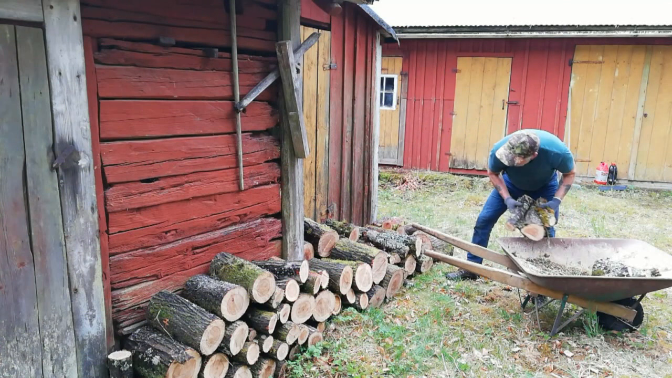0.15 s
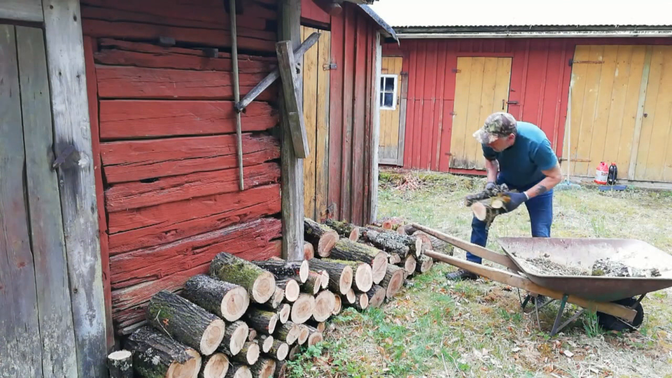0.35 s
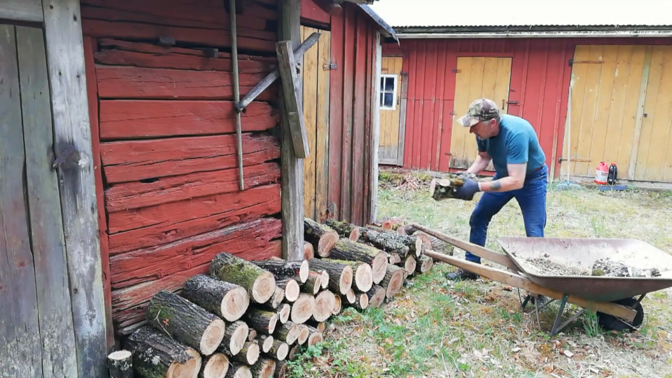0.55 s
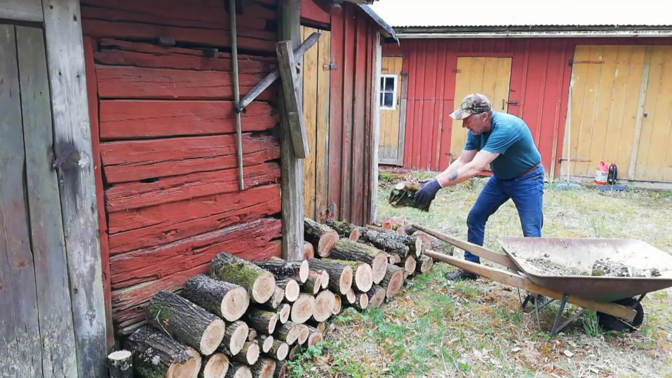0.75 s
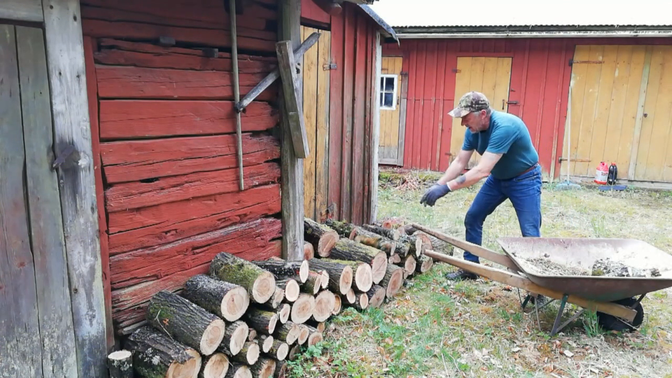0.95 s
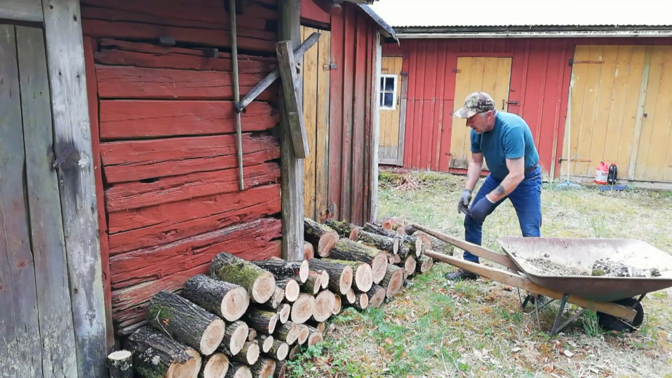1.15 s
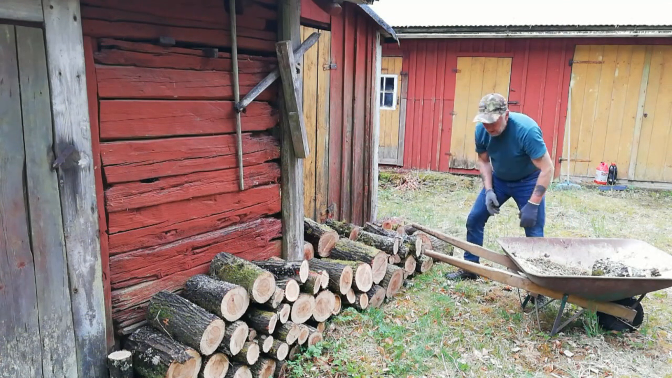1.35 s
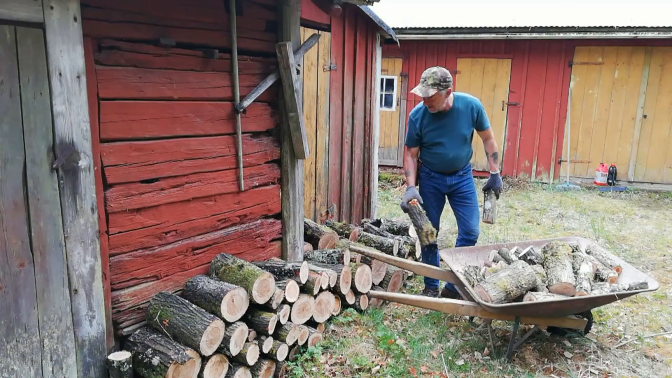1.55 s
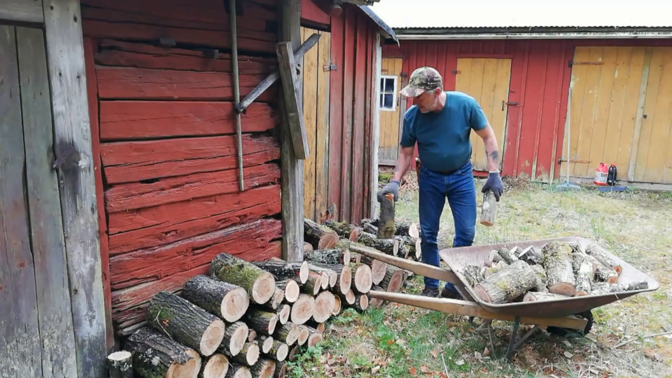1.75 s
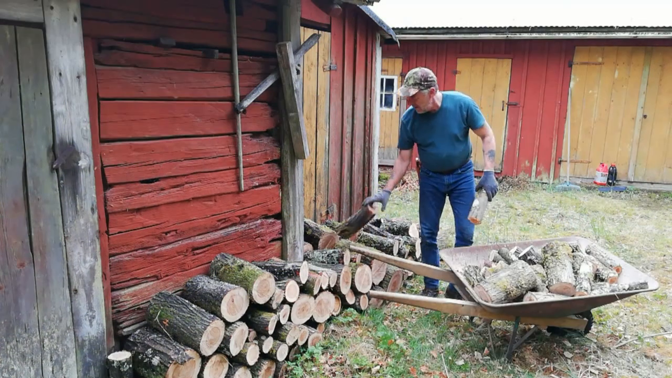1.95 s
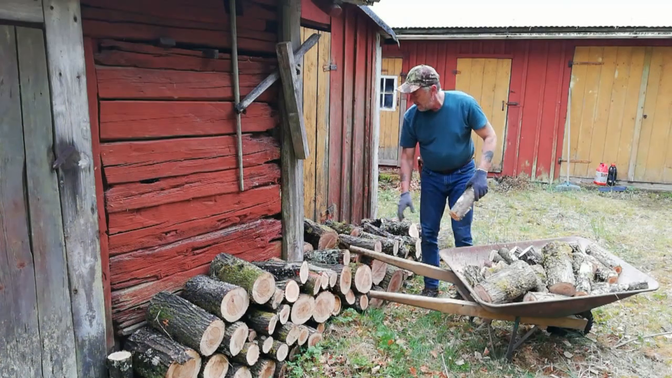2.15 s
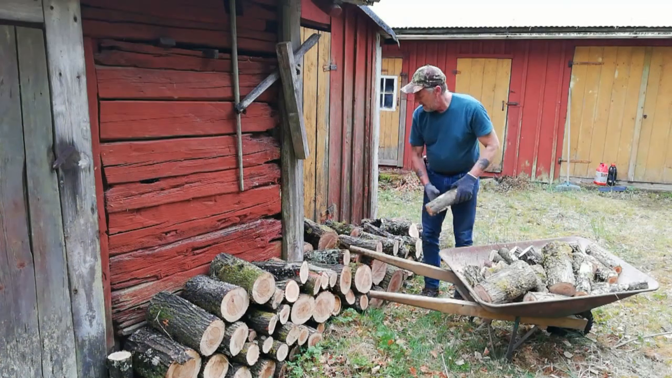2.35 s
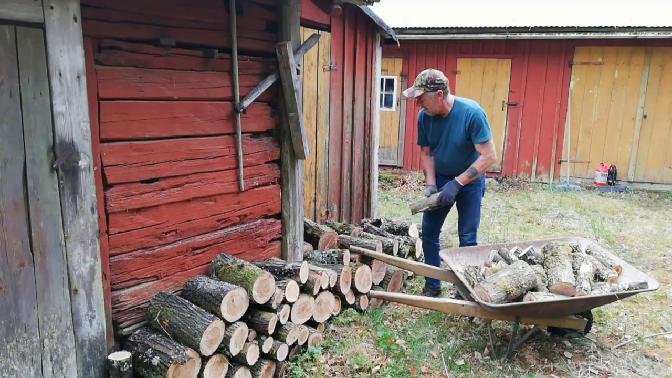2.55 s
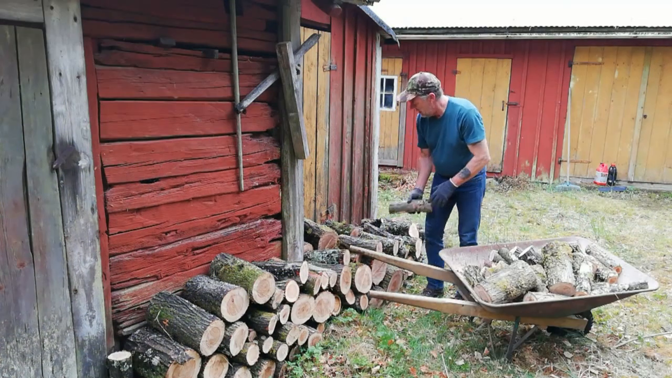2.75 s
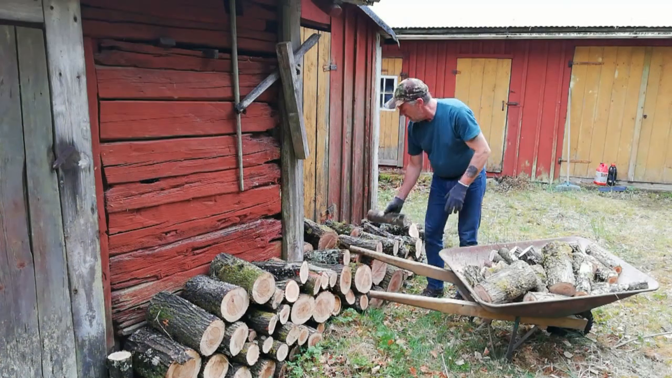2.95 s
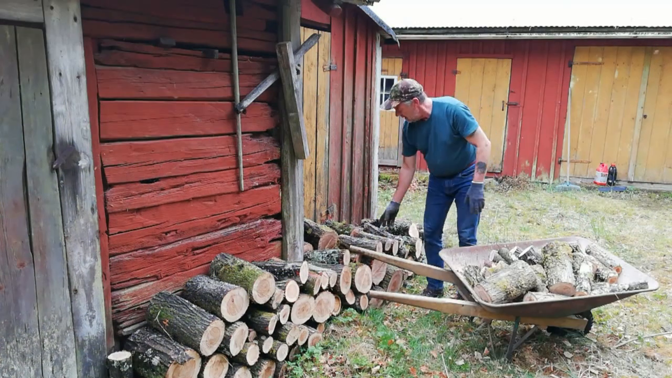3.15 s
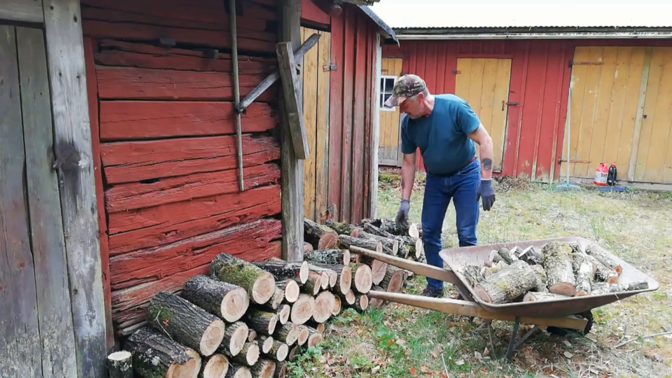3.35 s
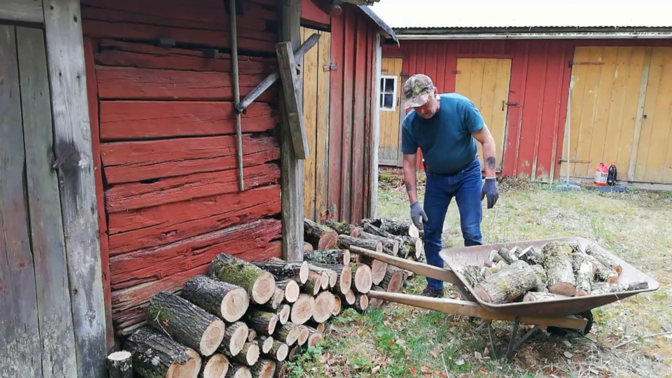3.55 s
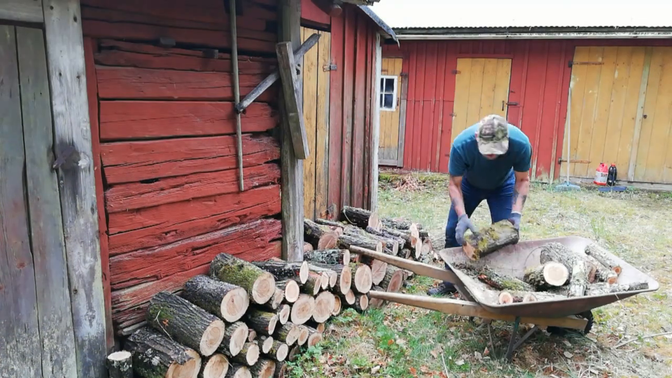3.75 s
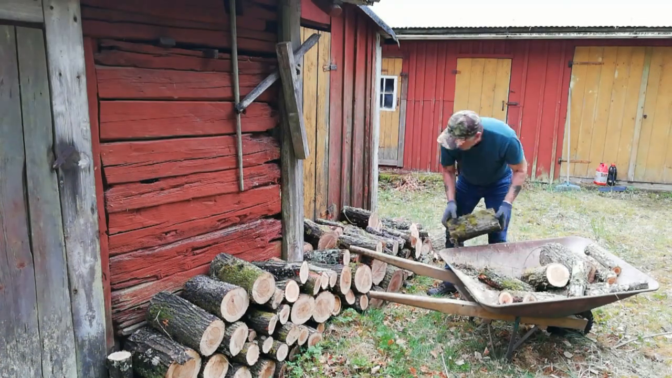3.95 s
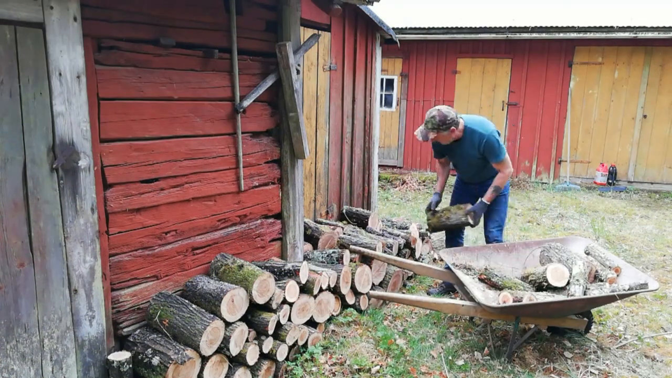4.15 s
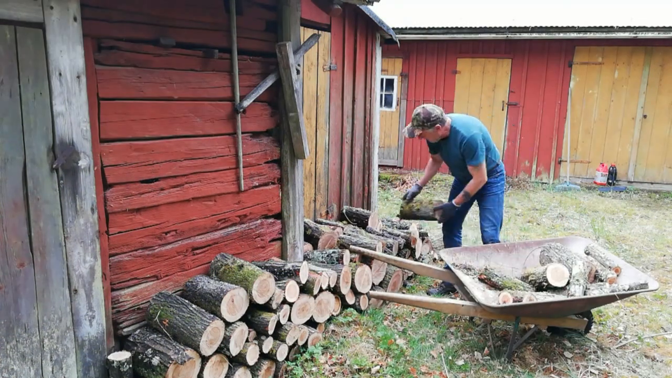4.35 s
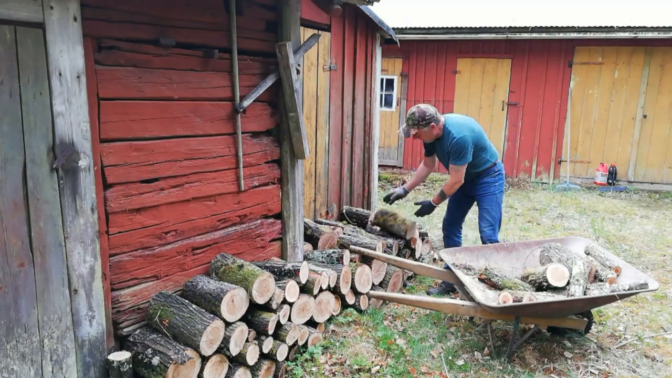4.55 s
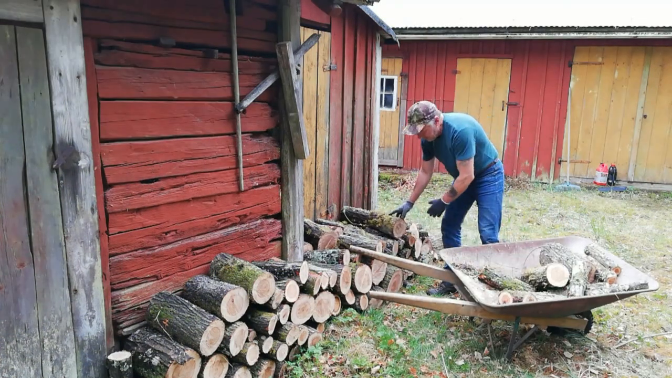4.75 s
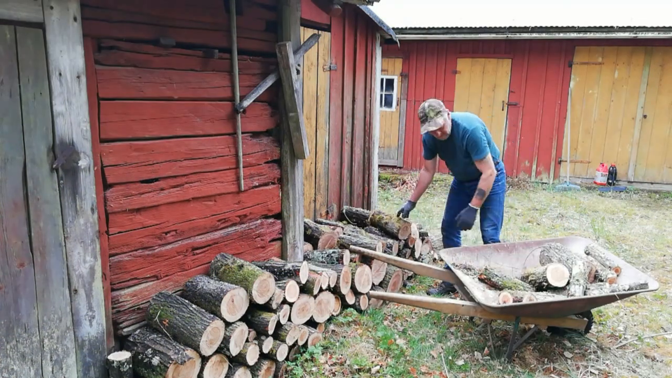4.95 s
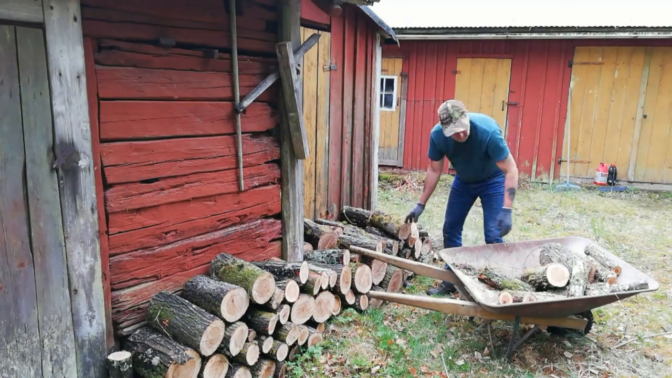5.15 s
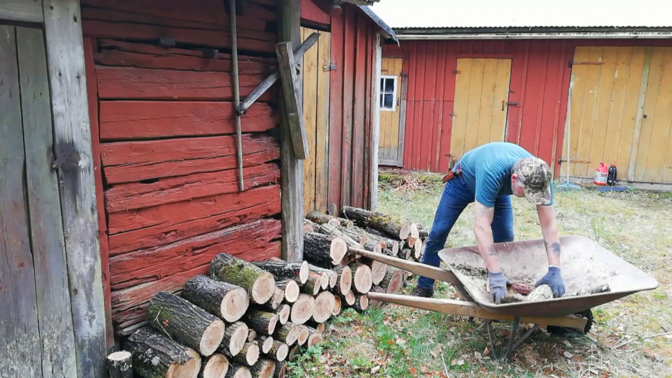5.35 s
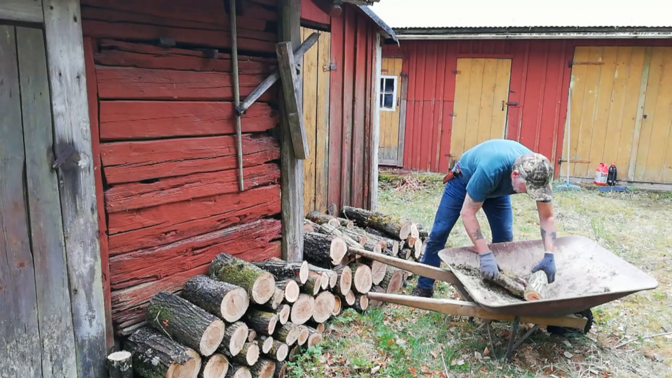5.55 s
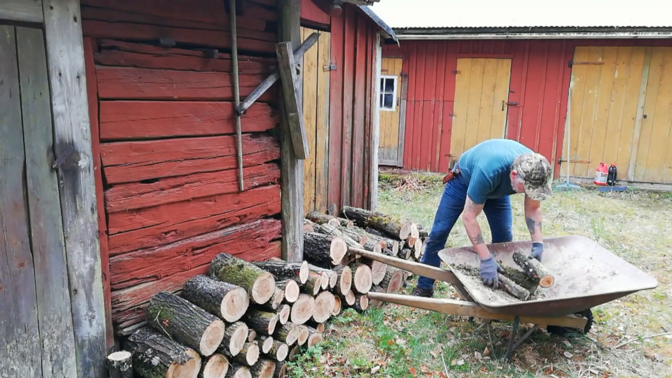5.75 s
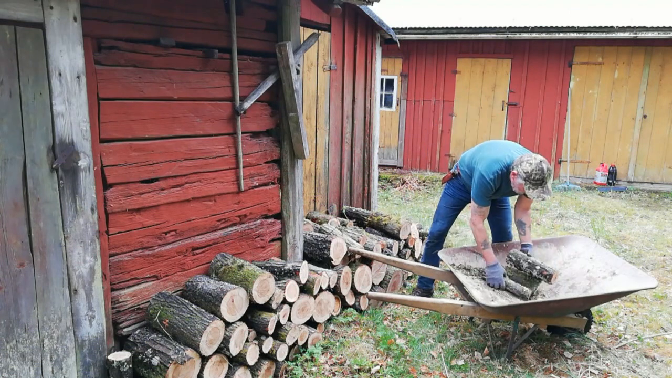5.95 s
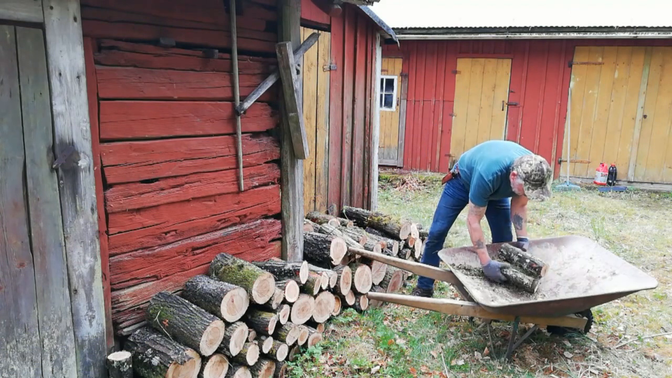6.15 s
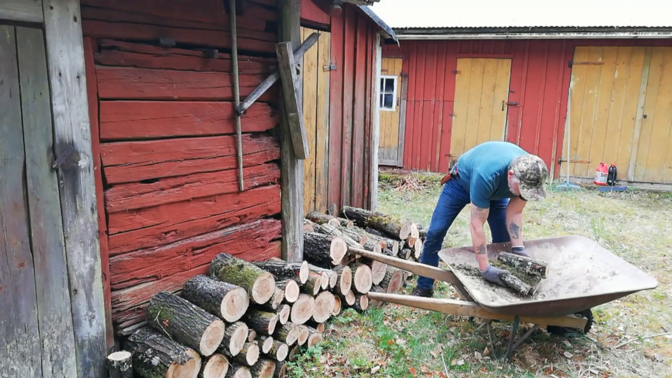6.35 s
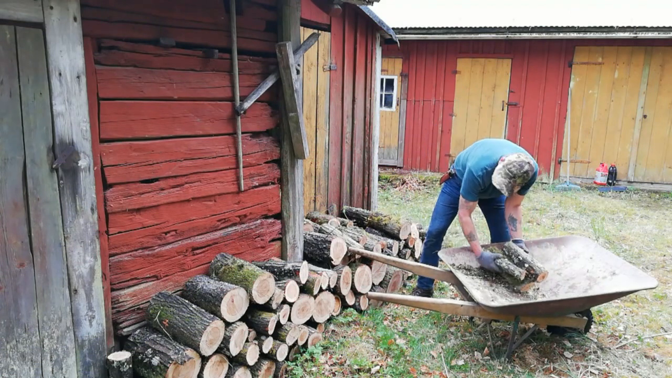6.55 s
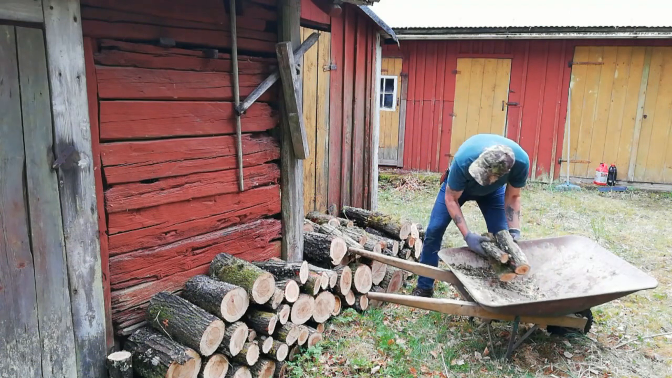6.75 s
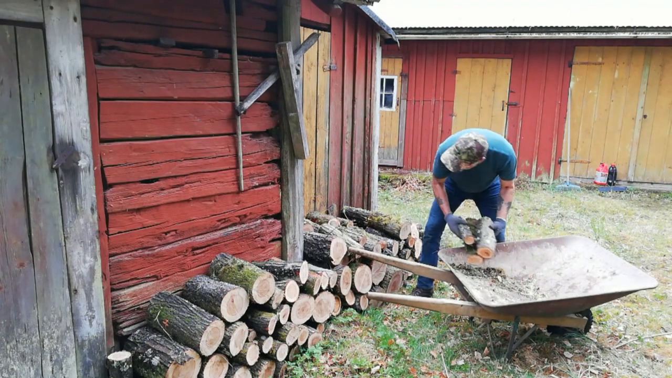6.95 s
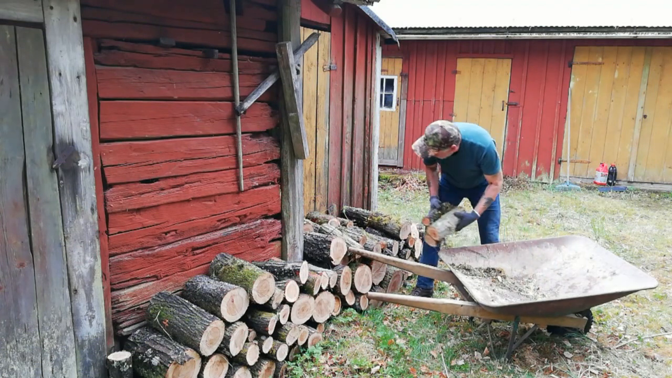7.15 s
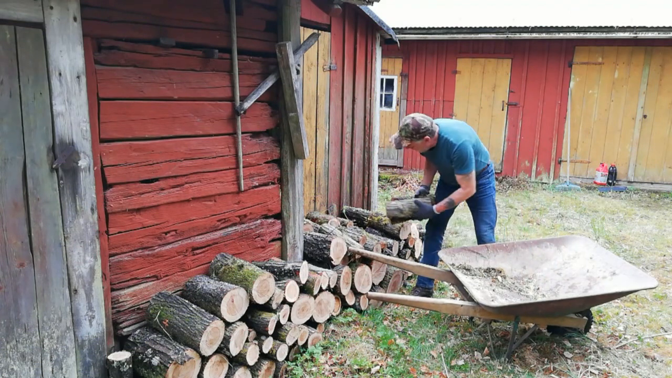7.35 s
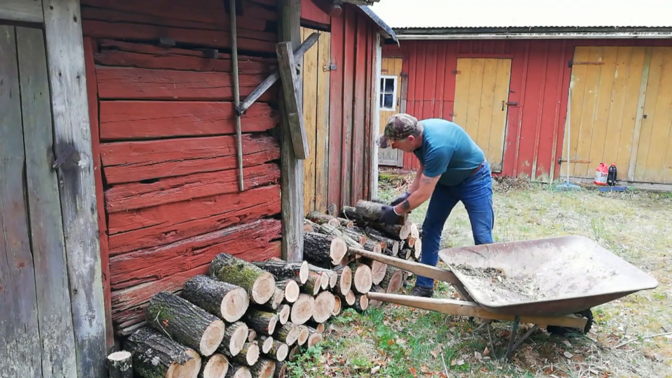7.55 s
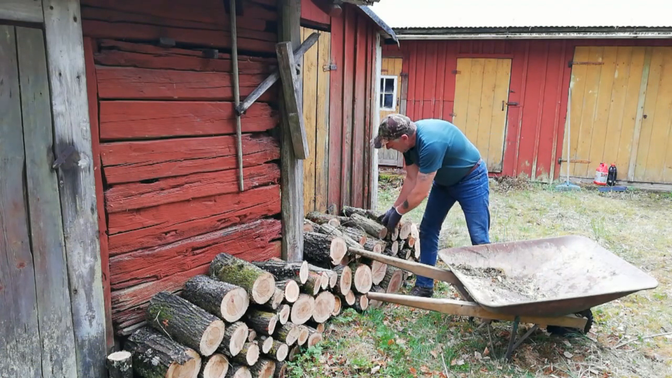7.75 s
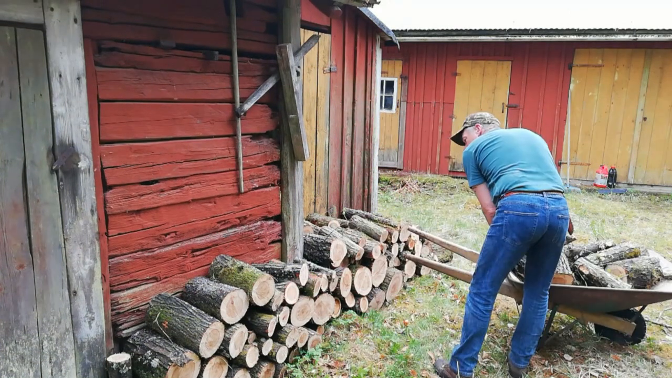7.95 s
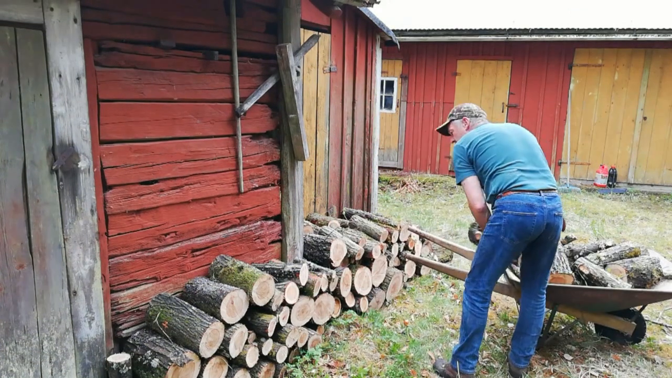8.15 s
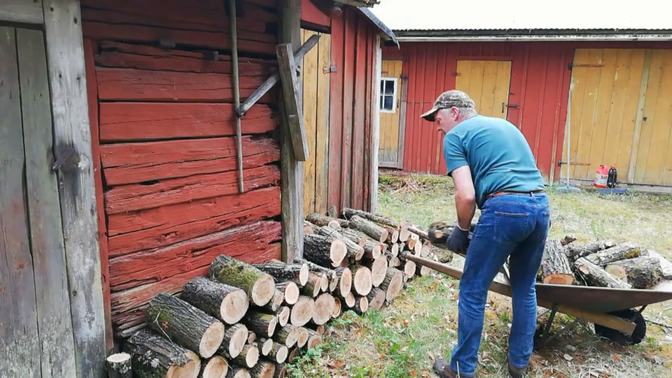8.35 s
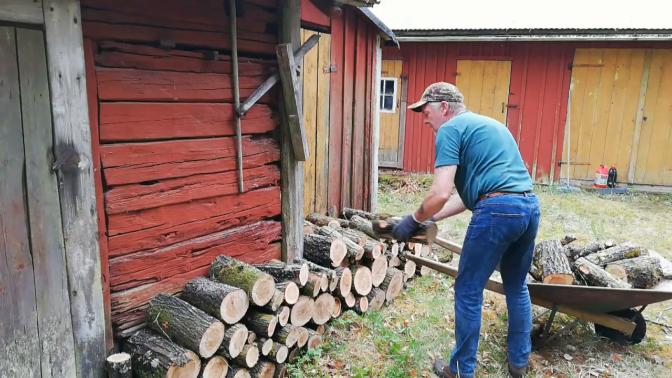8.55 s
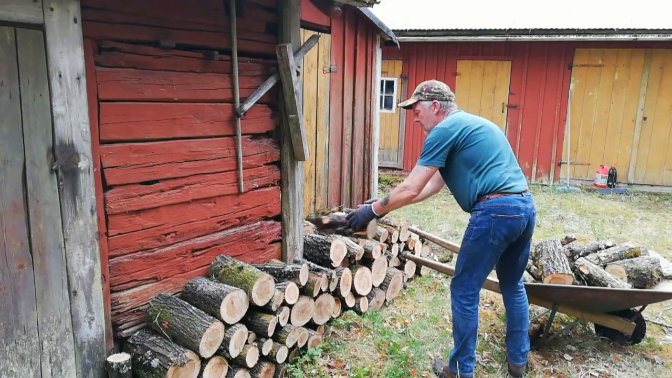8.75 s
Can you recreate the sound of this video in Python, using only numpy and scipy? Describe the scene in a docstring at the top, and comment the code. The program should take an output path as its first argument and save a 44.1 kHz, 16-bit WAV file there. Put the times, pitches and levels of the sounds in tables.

```python
"""Unloading logs beside a shed

Split logs are lifted out of a sheet-metal wheelbarrow and laid on a pile along a shed wall.
Wood and metal ring as decaying modes; cracking bark, rattles and shoved logs are shaped coloured noise.
A two-note bird, a trilling bird and faint far ones are near-sines on pitch curves.
Random spectra make distant air and light wind; sparse taps make yard echoes, which break off at
three moments. The sound stops short after the last log."""
import sys
import numpy as np
from scipy import signal
from scipy.fft import rfft, irfft, next_fast_len
from scipy.io import wavfile
from scipy.ndimage import uniform_filter1d

SR = 44100
rng = np.random.default_rng(int(sys.argv[2]) if len(sys.argv) > 2 else 0)


def wrap_up_sound(samples):
    """Save the sound to the file named by the first command line argument, as 16-bit audio."""
    columns = np.atleast_2d(samples).T
    # keep every value between -1 and 1, then stretch to whole-number steps
    tamed = np.clip(columns, -1, 1)
    steps = np.round(tamed * 32767).astype(np.int16)
    wavfile.write(sys.argv[1], SR, steps)


N = 392490

# Colour of bright bark noise. Each row: frequency in Hz, relative density in dB per Hz.
BARK_COLOUR = [(2940, -35.5), (5000, -5), (6160, -7), (8290, 1.5), (12000, -0.5), (13000, -9),
               (14600, -15.5), (16000, -36.5)]


def amp(db):
    """Decibels to gain."""
    return 10 ** (np.asarray(db) / 20)


def evened(x):
    """Scales to rms 1."""
    return x / np.sqrt(np.mean(x ** 2) + 1e-20)


def drift(length, size):
    """Slow random wander of rms 1, smoothed over size samples."""
    return evened(uniform_filter1d(rng.standard_normal(length), size=size))


def read(points, hz):
    """Reads a table on a log-frequency axis."""
    f, value = np.transpose(points)
    return np.interp(np.log(hz + 1), np.log(f + 1), value)


def add(mix, s, sound):
    """Mixes a sound in at s seconds."""
    part = mix[max(round(s * SR), 0):][:len(sound)]
    part += sound[:len(part)]


def noise(spectrum, grain_db):
    """Coloured noise of rms 1 whose samples come in uneven grains."""
    size = next_fast_len(N)
    grains = amp(grain_db * drift(size, 60))
    white = grains * rng.standard_normal(size)
    colour = amp(read(spectrum, np.fft.rfftfreq(size, 1 / SR)))
    return evened(irfft(rfft(white) * colour, size)[:N])


def swell(rise, hold, sag_db, fade_db):
    """Gain that rises, holds while sagging by sag_db a second, then also fades by fade_db a second."""
    t = np.arange(round(.7 * SR)) / SR
    after = np.maximum(t - rise - hold, 0)
    return np.minimum(t / max(rise, 1e-3), 1) ** 2 * amp(-sag_db * (t - after) - fade_db * after)


def struck(modes, contact_ms, spread_db):
    """Modes rung by a few uneven impacts during the contact; peak 1."""
    hz, db, t60 = np.transpose(modes)[:, :, None]
    t = np.arange(round(min(.5, t60.max()) * SR)) / SR
    db = db + spread_db * rng.standard_normal(db.shape)
    phase = 2 * np.pi * rng.random(db.shape)
    partials = amp(db - 60 * t / t60) * np.sin(2 * np.pi * hz * t + phase)
    ring = partials.sum(0) * (1 - np.exp(-t / 0.0016))
    when, force = rng.random((2, 5))
    weights = 0.23 * force + (when == when.min())  # one impact stands out
    delays = when * when.argsort().clip(0, 1) * contact_ms / 1000  # one impact is moved to the start
    impacts = np.bincount((delays * SR).astype(int), weights)
    sound = signal.oaconvolve(ring, impacts)
    return sound / abs(sound).max()


def crowded(modes, count, top_hz, below_db):
    """Adds many weaker modes at random pitches from the lowest main mode up to top_hz."""
    hz, db, t60 = np.transpose(modes)
    extra = hz[0] * (top_hz / hz[0]) ** rng.random(count)
    slope_db = -5. * np.log2(np.maximum(extra / hz[-1], 1))
    extra_db = np.interp(extra, hz, db) + slope_db - below_db
    weak = np.transpose([extra, extra_db, 0.99 * np.interp(extra, hz, t60)])
    return np.vstack([modes, weak])


def whistle(hz, db, taper):
    """A near-sine along a pitch curve."""
    tone = np.sqrt(2) * np.sin(2 * np.pi * np.cumsum(hz) / SR)
    return amp(db) * tone * signal.windows.tukey(len(hz), taper)


def shaped(shape):
    """Pitch of a note, sample by sample."""
    s, hz = np.transpose(shape)
    return np.interp(np.arange(0, s[-1], 1 / SR), s, hz)


def sing(song, s, note, direct_db, sent_db):
    """Adds one note to the direct song and to what is sent to the walls."""
    add(song[0], s, amp(direct_db) * note)
    add(song[1], s, amp(sent_db) * note)


def air():
    """Distant air and light wind: random short-time spectra, lumpy in the bass."""
    # Colour of the air. Each row: frequency in Hz, relative density in dB per Hz.
    air_colour = [(15, -32.5), (25, 0.5), (48, -2), (97, -11), (190, -12), (236, -13), (545, -18),
                  (1190, -19), (1480, -19), (1940, -21), (2280, -23), (2540, -21.5), (5720, -23.5),
                  (10100, -25.5), (16000, -34)]
    # How alike left and right are. Each row: frequency in Hz, likeness from -1 to 1.
    air_likeness = [(60, 0.98), (130, 0.91), (290, -0.13), (640, -0.64), (1410, 0.17), (3100, 0.0053),
                    (6820, -0.26), (15000, 0.12)]
    level_db = -64  # rms of the mean of both sides
    frames, hz = N // 256 + 5, np.fft.rfftfreq(1024, 1 / SR)
    a, b, c, d, patches = rng.standard_normal((frames, 513, 5)).T
    patches = uniform_filter1d(uniform_filter1d(patches, size=14, axis=0), size=14, axis=1)
    patches_db = (.8 + 1.6 * (hz < 150))[:, None] * evened(patches)
    alike = np.clip(read(air_likeness, hz), -1, 1)[:, None]
    left = a + 1j * b
    right = alike * left + np.sqrt(1 - alike ** 2) * (c + 1j * d)
    z = np.array([left, right]) * amp(read(air_colour, hz)[:, None] + patches_db)
    sound = signal.istft(z, nperseg=1024, noverlap=768)[1][:, :N]
    return amp(level_db) * sound / sound.mean(0).std()


def far_birds():
    """Faint far whistles and warbles: gliding tones whose pitch is smeared by distance."""
    # Each row: start in seconds, length in seconds, start pitch in Hz, end pitch in Hz,
    # pitch blur in Hz rms, level in dB.
    far_notes = [(1.105, 0.13, 1768, 1550, 81, -63.5), (1.5, 0.14, 2200, 2136, 30.2, -71.5),
                 (1.702, .14, 2390, 2280, 70, -74.5), (1.65, 0.39, 1481, 1506, 119, -77),
                 (2.244, 0.29, 1608, 1630, 110, -77), (1.659, 0.033, 3820, 4240, 40, -73),
                 (4.805, 0.053, 3320, 4130, 304, -70.5), (4.922, 0.073, 3110, 3660, 260, -68.5),
                 (4.954, 0.025, 4660, 4460, 220, -68.5), (5.087, 0.11, 3110, 3550, 260, -70),
                 (5.127, 0.033, 4680, 4500, 220, -71.5), (5.279, .075, 3200, 3650, 257, -67),
                 (5.31, 0.029, 4660, 4520, 220, -69), (6.049, 0.18, 2134, 2100, 40, -76.5)]
    song = np.zeros((2, N))
    for s, length, start_hz, end_hz, blur_hz, db in far_notes:
        glide = np.linspace(start_hz, end_hz, round(length * SR))
        blur = blur_hz * drift(len(glide), 150)
        sing(song, s, whistle(glide + blur, db, taper=0.45), 0, 0.5)
    return song


def two_note_bird():
    """A high and a low whistle in turn, four times, each along a bent pitch curve."""
    # Pitch curves of the high and the low note. Each row: seconds into the note, pitch in Hz.
    high_note, low_note = [(0, 5850), (.02, 5170), (.04, 4930), (.055, 4800)], [(0, 4150), (.01, 4350), (0.058, 4040), (.11, 3900)]
    first_s, low_delay_s, repeat_s = .094, .144, .339
    high_db, low_db = -64.5, -63.5
    song = np.zeros((2, N))
    for s in first_s + repeat_s * np.arange(4):
        sing(song, s, whistle(shaped(high_note), high_db, taper=0.2), 0, -2.0)
        sing(song, s + low_delay_s, whistle(shaped(low_note), low_db, taper=0.14), 0, -4.5)
    return song


def trilling_bird():
    """Falling sweeps, each with a narrowing frequency trill; low notes with a growing trill close two groups."""
    # Each row: start in seconds, pitch factor of the sweep, sweep level in dB, trill delay in seconds,
    # trill centre in Hz, initial swing in Hz, trill peak level in dB, gain of the direct path in dB.
    phrases = [(2.514, 1.05, -64, 0.069, 5380, 446, -54.5, -1.5),
               (2.78, 1, -55.5, 0.075, 5005, 513, -50.5, -2.5),
               (3.27, 0.9, -55, 0.068, 4710, 450, -49, -5.5),
               (3.537, 0.95, -57, 0.074, 4520, 460, -54.5, -4),
               (5.733, 1.03, -66.5, .064, 5390, 750, -57, 6),
               (6.015, 0.98, -59, 0.067, 5050, 700, -54.5, 4)]
    # Sweep before the pitch factor. Each row: seconds into the sweep, pitch in Hz.
    sweep_curve = [(0, 8240), (.008, 6100), (.02, 4820), (.035, 4320), (.048, 4250), (.055, 3475),
                   (.062, 4200)]
    # Low closing notes. Each row: start in seconds, level in dB, gain of the direct path in dB.
    closing_notes = [(3.042, -46, -15.5), (6.274, -54, -2.5)]
    # Their pitch before the trill. Each row: seconds into the note, pitch in Hz.
    closing_curve = [(0, 2888), (.015, 3000), (.05, 3140), (.075, 3350), (.125, 3258)]
    trill_per_s, trill_s, narrow_s, trill_ends_db = 48, 0.089, 0.059, 11
    song = np.zeros((2, N))
    t = np.arange(round(trill_s * SR)) / SR
    trill = np.exp(-t / narrow_s) * np.cos(2 * np.pi * trill_per_s * t)
    trill_swell_db = -trill_ends_db * (2 * t / trill_s - 1) ** 2  # loudest in the middle
    for s, factor, sweep_db, delay, trill_hz, swing_hz, trill_db, direct_db in phrases:
        sweep = whistle(factor * shaped(sweep_curve), sweep_db, taper=0.45)
        sing(song, s, sweep, direct_db, -0.55)
        trilled = whistle(trill_hz + swing_hz * trill, trill_db + trill_swell_db, taper=.15)
        sing(song, s + delay, trilled, direct_db, -3.0)
    hz = shaped(closing_curve)
    t = np.arange(len(hz)) / SR
    swing = 120 * np.clip((t - .02) / 0.04, 0, 1)  # Hz
    hz = hz + swing * np.sin(2 * np.pi * trill_per_s * (t - .054))
    for s, db, direct_db in closing_notes:
        sing(song, s, whistle(hz, db, taper=0.23), direct_db, -9.0)
    return song


def rim():
    """The emptied tray sings under the last shoves: two wavering, throbbing resonances."""
    # Each row: start in seconds, rise in seconds, hold in seconds, lower band in dB, upper band in dB.
    rim_swells = [(6.5, 0.071, 0.2, -63, -68.5), (6.713, 0.025, 0.025, -51.5, -55.5)]
    # Lower, then upper band. Each row: centre in Hz, pitch waver in Hz rms.
    rim_bands = [(1800, 90), (2480, 160)]
    fade_db_per_s = 105
    out = np.zeros(N)
    for s, rise, hold, *dbs in rim_swells:
        shape = swell(rise, hold, 0, fade_db_per_s)
        for (hz, waver_hz), db in zip(rim_bands, dbs):
            waver, throb = drift(len(shape), 200), drift(len(shape), 200)
            add(out, s, shape * whistle(hz + waver_hz * waver, db + 3.7 * throb, taper=0))
    return out


def rubbing():
    """Bark rubs while logs are rummaged in the tray: bright noise under a level curve."""
    # Each row: time in seconds, hiss level in dB.
    rub_levels = [(5.366, -58), (5.374, -46.5), (5.408, -44.5), (5.488, -51.5), (5.498, -52), (5.544, -59),
                  (5.712, -59), (5.81, -73), (6.014, -67.5), (6.34, -74.5), (6.348, -64.5), (6.386, -76.5),
                  (6.672, -56), (6.716, -69.5), (6.728, -38.5), (6.818, -49.5), (6.874, -76), (6.9, -82)]
    s, db = np.transpose(rub_levels)
    level = np.zeros(N)
    add(level, s[0], amp(np.interp(np.arange(s[0], s[-1], 1 / SR), s, db)))
    return level * noise(BARK_COLOUR, grain_db=1.5)


def shoves():
    """Shoved logs shake the tray with a stream of small slips: rumble, clatter and a wavering hum."""
    # Each row: start in seconds, rise in seconds, hold of rumble and clatter in seconds,
    # sag while holding in dB per second, rumble, clatter and sheet hum in dB, hum hold in seconds.
    shove_rows = [(0, .003, .035, 15.5, -25.5, -31, -34.5, .01),
                  (1.454, .006, .022, 40, -37, -52, -36, .03),
                  (3.686, .005, .08, 11, -52, -64.5, -57.5, .06),
                  (3.778, .008, .025, 61, -32, -40.5, -26, .025),
                  (3.851, .022, .01, 28, -43.5, -52, -33.5, .015),
                  (3.965, .01, 0.013, 45.5, -38.5, -53, -33, .15),
                  (5.362, .008, .13, 22, -35, -41, -46.5, .12),
                  (5.559, .024, .012, 30, -44.5, -55, -47.5, .01),
                  (5.684, .06, .03, 27, -49.5, -56.5, -51, .08),
                  (5.888, .028, .005, 34, -51.5, -64, -63.5, .03),
                  (5.977, .034, .05, 30, -65, -67.5, -58.5, .13),
                  (6.246, .004, .025, 60, -33.5, -55.5, -37, .02),
                  (6.331, .02, .005, 30, -56.5, -50.5, -42.5, .008),
                  (6.397, .1, .03, 31, -54, -64, -50.5, .02),
                  (6.544, .08, .05, 34, -45.5, -49.5, -49.5, .015),
                  (6.724, .004, 0.1, 121, -43, -36, -53, .04),
                  (6.782, .045, .04, 29.5, -48.5, -62, -36, .08),
                  (6.99, 0.033, .04, 30, -70, -68, -54.5, .06)]
    # Fade after a shove in dB per second: rumble, clatter, hum.
    shove_fades = [181, 231.5, 161.5]
    # Colours of the two noises. Each row: frequency in Hz, relative density in dB per Hz.
    rumble_colour, clatter_colour = [(59, -35.5), (100, -8.5), (144, -3.5), (189, 0), (316, 3), (408, 6),
                                     (646, -2.5), (900, -7), (1170, -15.5), (1980, -120)], [(470, -35.5), (800, 2.5), (885, -4.5), (979, 1.5),
                                                     (1270, -1.5), (1420, -0.5), (2090, -12.5), (2350, -15),
                                                     (2730, -20), (3000, -17.5), (3600, -21), (3810, -21.5),
                                                     (4500, -25), (5850, -46), (9900, -120)]
    hum_hz, hum_waver_hz = 204.1, 7.95
    levels = np.zeros((3, N))
    for s, rise, hold, sag_db, *dbs, hum_hold in shove_rows:
        for level, db, held, fade_db in zip(levels, dbs, (hold, hold, hum_hold), shove_fades):
            add(level, s, amp(db) * swell(rise, held, sag_db, fade_db))
    hum = np.sin(2 * np.pi * np.cumsum(hum_hz + hum_waver_hz * drift(N, 900)) / SR)
    hum = evened(hum * amp(1.4 * drift(N, 900)))  # uneven as the logs shift
    lumps = evened(amp(1.3 * drift(N, 500)))  # slips come in clumps
    rumble = lumps * noise(rumble_colour, grain_db=0.5)
    clatter = lumps * noise(clatter_colour, grain_db=2.0)
    return (levels * [rumble, clatter, hum]).sum(0)


def tray_bumps():
    """Logs bump the tray: the sheet rings in many modes and the frame thumps in one."""
    # Each row: start in seconds, peak in dB, hardness in dB per octave above 200 Hz,
    # frame thump peak in dB, damping factor of the sheet.
    bump_rows = [(0.023, -32.5, 3, -54.5, 0.6), (1.447, -19.5, -1, -51, 2.2), (3.686, -42, -6, -46, 1.01),
                 (3.752, -46, 1, -49, 1.1), (3.786, -18, 6, -51.5, 2.4), (3.859, -23.5, -22, -66.5, 2.2),
                 (3.977, -19.5, -9, -53.5, 1.4), (5.366, -41, -1, -66, 0.88),
                 (5.498, -34.5, 15, -46.5, 0.81), (5.578, -35.5, 3, -48.5, 1.1),
                 (5.632, -41.5, -4, -42, 0.64), (5.719, -41.5, -21, -39.5, 0.36),
                 (5.919, -46.5, -6, -43.5, 1.9), (6.254, -28, 3, -45.5, 0.65), (6.339, -33.5, 4, -51, 0.51),
                 (6.609, -50, 12, -60, 0.51), (6.631, -47.5, 3, -67, 0.5), (6.728, -52, 16, -60, 2.4),
                 (6.83, -40, -14, -45, 0.45)]
    # Sheet before hardness and damping. Each row: mode in Hz, relative level in dB, t60 in seconds.
    sheet_modes = [(108.1, -9.5, 0.4), (142.5, -7.5, 0.44), (196.8, -2.5, 0.55), (265, 6, 0.2),
                   (307.6, -5, 0.52), (385, -5, 0.42), (479.5, -2, 0.092), (556.4, 7, 0.098),
                   (646.4, -16.5, 0.075), (808, -22, .2), (977, -7.5, 0.15), (1137, -15, .2),
                   (1404, -24.5, 0.16), (1750, -40, 0.1)]
    contact_ms, frame_hz, frame_t60 = 8.8, 73.8, 0.37
    out = np.zeros(N)
    for s, db, hardness_db, thump_db, damping in bump_rows:
        modes = [(hz, g + hardness_db * max(np.log2(hz / 200), 0), t60 / damping)
                 for hz, g, t60 in sheet_modes]
        modes = crowded(modes, count=14, top_hz=2650, below_db=1.5)
        add(out, s, amp(db) * struck(modes, contact_ms, spread_db=1.0))
        add(out, s, amp(thump_db) * struck([(frame_hz, 0, frame_t60)], 23.0, spread_db=0))
    return out


def bark():
    """A sharp crack with a bright and a dull part, then crumbs falling for a moment."""
    # Each row: start in seconds, bright part in dB, dull part in dB,
    # crack t60 in seconds (at least 5 ms is used), bright crumbs in dB.
    crack_rows = [(0.0024, -42, -37, 0.073, -78), (0.024, -49.5, -43, 0.082, -62),
                  (1.021, -30.5, -26, 0.027, -37), (1.034, -47.5, -55, .08, -57.5),
                  (1.063, -32, -39.5, 0.038, -63.5), (1.0894, -49, -51, 0.025, -62),
                  (1.1878, -52.5, -54.5, 0.073, -70.5), (1.446, -62, -82, .04, -58.5),
                  (2.074, -34, -51, 0.0096, -62.5), (2.15, -46, -57, 0.031, -55.5),
                  (2.155, -34.5, -69, 0.018, -62), (2.6938, -46, -76, 0.007, -72.5),
                  (3.129, -52.5, -72, 0.056, -57.5), (3.1548, -43, -46, 0.045, -58.5),
                  (3.4306, -62, -56, 0.032, -74), (3.687, -42.5, -55.5, 0.053, -65),
                  (3.743, -55, -61.5, 0.031, -86), (3.781, -32, -34, 0.054, -43),
                  (3.9725, -56, -63, 0.067, -79), (4.6504, -40, -49, 0.038, -64),
                  (4.6587, -37.5, -34.5, 0.043, -49.5), (4.684, -51, -48, 0.01, -59),
                  (5.4967, -38, -73, 0.023, -59), (6.345, -59, -59, .04, -83),
                  (6.7272, -33, -37.5, 0.044, -80), (7.745, -35, -39, 0.074, -69),
                  (7.7521, -48, -37, 0.039, -48.5)]
    # Colour of the dull part. Each row: frequency in Hz, relative density in dB per Hz.
    dull_colour = [(1060, -16.5), (1800, -3), (2440, -12.5), (2980, -4), (4840, -4), (5270, -15),
                   (6500, -5), (8450, -39), (14300, -120)]
    crumbs_t60, dull_crumbs_db = 0.32, -8  # seconds; dull crumbs against bright ones
    bright, dull = np.zeros((2, N))
    t = np.arange(SR // 2) / SR
    start = np.minimum(t / 0.0011, 1)
    for s, db, dull_db, t60, crumbs_db in crack_rows:
        crack_db = -60 * t / max(t60, .005)
        crumbs = amp(crumbs_db - 60 * t / crumbs_t60)
        add(bright, s, start * (amp(db + crack_db) + crumbs))
        add(dull, s, start * (amp(dull_db + crack_db) + amp(dull_crumbs_db) * crumbs))
    return bright * noise(BARK_COLOUR, grain_db=2.0) + dull * noise(dull_colour, grain_db=3.5)


def pile():
    """Each log thuds on the stack, rings along its length, shakes the shed wall and leaves the stack rattling."""
    # Each row: start in seconds, thud peak in dB, hardness in dB per octave around 200 Hz,
    # log ring in Hz, ring peak in dB, wall boom peak in dB, rattle level in dB.
    knock_rows = [(1.022, -21.5, 1, 1620, -25, -30.5, -28.5), (1.065, -30.5, 6.5, 1626, -33.5, -35, -45.5),
                  (1.088, -35.5, 3, 1370, -35.5, -51.5, -53), (1.189, -62, 14, 1530, -45, -54, -70),
                  (1.203, -46, -3.2, 1594, -46.5, -54.5, -71.5), (1.446, -20, -4.5, 1265, -36, -42, -55.5),
                  (2.07, -33.5, -1.5, 1290, -74, -41, -57), (2.149, -38, -4.5, 1360, -50, -37, -45),
                  (2.197, -66.5, -4, 1730, -50.5, -39, -83), (3.133, -51.5, 11.5, 1700, -52.5, -53.5, -59),
                  (3.154, -25.5, 6, 1780, -25, -42, -34), (3.187, -48, 8.5, 1642, -58, -37, -77.5),
                  (3.331, -52, -3, 1750, -54, -54.5, -58.5), (3.423, -60, -11, 1585, -54, -71, -92),
                  (4.652, -32.5, 4.4, 1516, -35, -63, -36), (4.688, -42, 7.5, 1610, -45, -50.5, -70),
                  (7.741, -37, -2, 1900, -58, -48, -42), (7.75, -23, 2.5, 1557, -33.5, -35, -29),
                  (7.78, -33, 2.5, 1225, -48, -42.5, -57), (7.829, -37, -4, 1263, -55, -43, -46.5),
                  (7.885, -39, -6.5, 1230, -67, -41.5, -53)]
    # Stack before hardness and damping. Each row: mode in Hz, relative level in dB, t60 in seconds.
    stack_modes = [(125, -4, 0.11), (166.8, -4.5, 0.15), (249.8, -6, 0.2), (300, -6, 0.09),
                   (451.6, -6, 0.055), (696, -9, 0.06), (880, -17, 0.11), (1146, -20.5, 0.12)]
    # Colour of the stack settling. Each row: frequency in Hz, relative density in dB per Hz.
    rattle_colour = [(53, -36.5), (90, 5), (135, -6), (226, 3), (407, -14.5), (1020, -18), (1470, -19),
                     (1670, -21), (1870, -30.5), (2800, -32.5), (3640, -68.5), (6160, -120)]
    contact_ms, log_t60, rattle_t60 = 5.8, 0.034, .19
    boom_hz, boom_t60 = 50.3, 0.29
    out, rattle = np.zeros((2, N))
    t = np.arange(SR // 2) / SR
    for s, db, hardness_db, ring_hz, ring_db, boom_db, rattle_db in knock_rows:
        damping = 1.2 * np.exp(.11 * hardness_db)  # a harder blow dies sooner
        modes = [(hz, g + hardness_db * np.log2(hz / 200), t60 / damping) for hz, g, t60 in stack_modes]
        modes = crowded(modes, count=40, top_hz=2625, below_db=2.5)
        add(out, s, amp(db) * struck(modes, contact_ms, spread_db=2.5))
        ring = [(ring_hz, 0, log_t60), (0.64 * ring_hz, -10, log_t60)]
        add(out, s + 0.0028, amp(ring_db) * struck(ring, 3.15, spread_db=1.5))
        add(out, s + .012, amp(boom_db) * struck([(boom_hz, 0, boom_t60)], 15.0, spread_db=0))
        add(rattle, s, amp(rattle_db - 60 * t / rattle_t60) * np.minimum(t / 0.0034, 1))
    return out + rattle * noise(rattle_colour, grain_db=0.0)


def yard(x):
    """Echoes of the sheds: sparse taps of random sign, each band dying at its own speed."""
    # Each row: frequency in Hz, echo t60 in seconds.
    echo_decay = [(100, .35), (500, .4), (2000, 0.35), (5000, 0.44), (12000, 0.17)]
    # Moments in seconds where the echoes break off.
    echo_breaks = [1.444, 3.684, 5.363]
    taps = np.zeros((2, SR // 2))
    slots = np.arange(260, SR // 2 - 20, 20)
    at = slots + rng.integers(0, 20, (2, len(slots)))
    np.put_along_axis(taps, at, rng.choice([-1., 1.], at.shape), 1)
    hz, t, z = signal.stft(taps, SR, nperseg=512)
    tail = signal.istft(z * amp(-60 * t / read(echo_decay, hz)[:, None]), SR, nperseg=512)[1]
    bass_alike = signal.lfilter(*signal.butter(2, 300, fs=SR), tail[0] - tail[1])
    tail[1] += bass_alike  # long waves reach both ports alike
    tail /= np.linalg.norm(tail[0])
    stretches = np.split(x, (np.array(echo_breaks) * SR).astype(int))
    return np.hstack([signal.fftconvolve(part[None], tail, axes=1)[:, :len(part)] for part in stretches])


def ports(x, turn):
    """Direct sound at two microphone ports; the side part turns with the direction of the source."""
    # Each row: frequency in Hz, side minus mid in dB.
    side_width = [(60, -32.5), (110, -24.5), (200, -28), (380, -5), (700, -1.5), (1290, -6), (2380, 2),
                  (4400, -0.5), (8120, -1), (15000, 2)]
    # Each row: frequency in Hz, radians by which side leads mid before the source's own turn.
    side_lead = [(200, -0.65), (700, -2), (1300, -1), (4400, -1.52), (8000, -0.44), (13000, -2.2)]
    size = next_fast_len(N)
    hz = np.fft.rfftfreq(size, 1 / SR)
    phase = read(side_lead, hz) + turn
    z = 2 * rfft(x, size) * amp(read(side_width, hz)) * np.exp(1j * phase)
    treble = np.clip(np.log2(hz / 700 + 1e-9) / 1.6, 0, 1)
    low, high = np.fft.ifft([z * (1 - treble), z * treble], size)[:, :N]
    scatter = 1.1 * drift(N, 400)  # radians: treble comes from shifting spots
    side = (low + high * np.exp(1j * scatter)).real
    return np.array([x + side, x - side])


def scene():
    """Wood, metal and birds, direct and echoed, over the air."""
    distance = air()
    song, sent = far_birds() + two_note_bird() + trilling_bird()
    metal = rim() + rubbing() + shoves() + tray_bumps()
    wood = bark() + pile()
    direct = ports(wood, turn=-.15) + ports(metal + song, turn=-0.29)
    return direct + yard(amp(-16.0) * (wood + metal) + sent) + distance


def record(dry):
    """The sound stops short; then a low-pass limits the band."""
    stop_s, edge_hz = 8.008, 15900
    still_on = np.clip((stop_s - np.arange(N) / SR) / 0.0014, 0, 1)
    low_pass = signal.firwin(511, edge_hz, window=("kaiser", 9), fs=SR)
    return signal.oaconvolve(dry * still_on, low_pass[None], "same")


dry = scene()
out = record(dry)
wrap_up_sound(out)
```